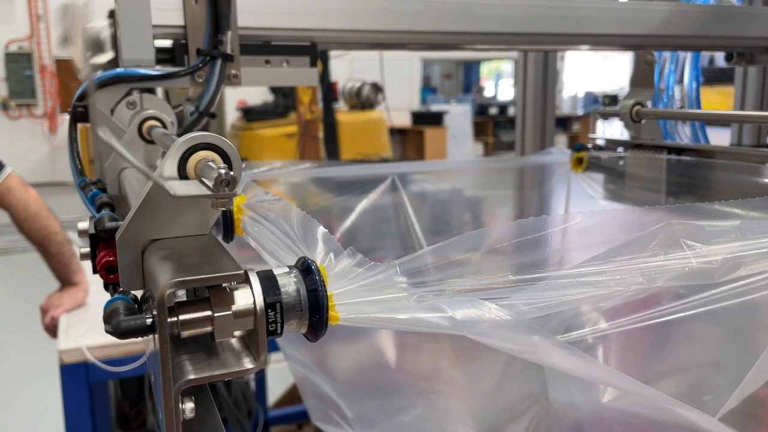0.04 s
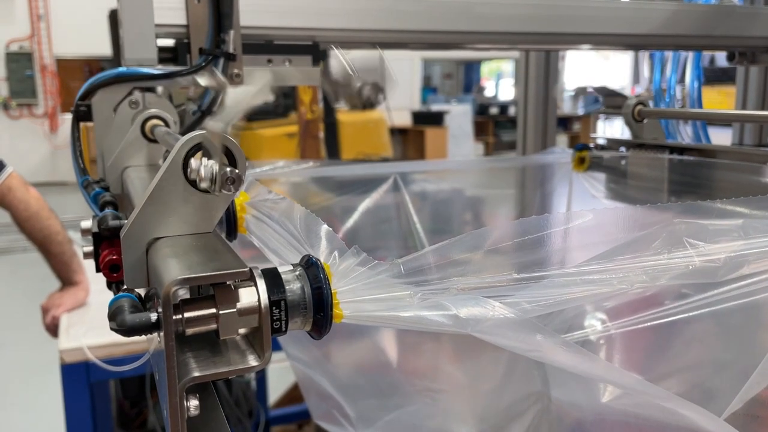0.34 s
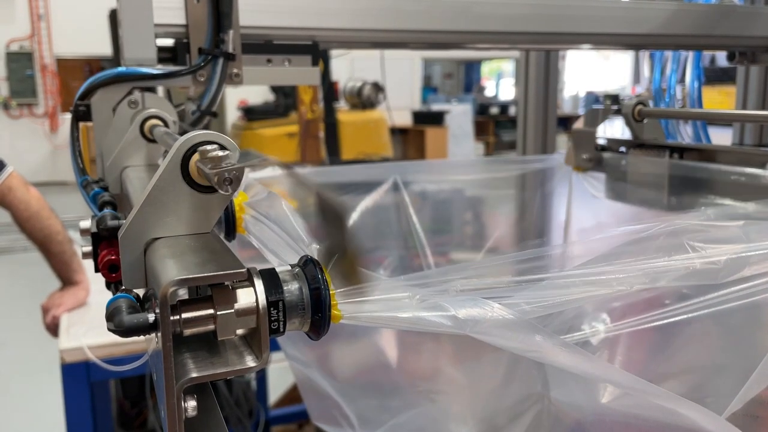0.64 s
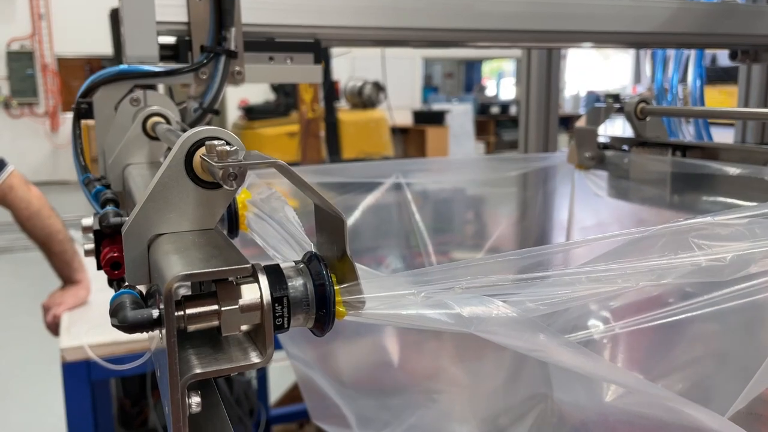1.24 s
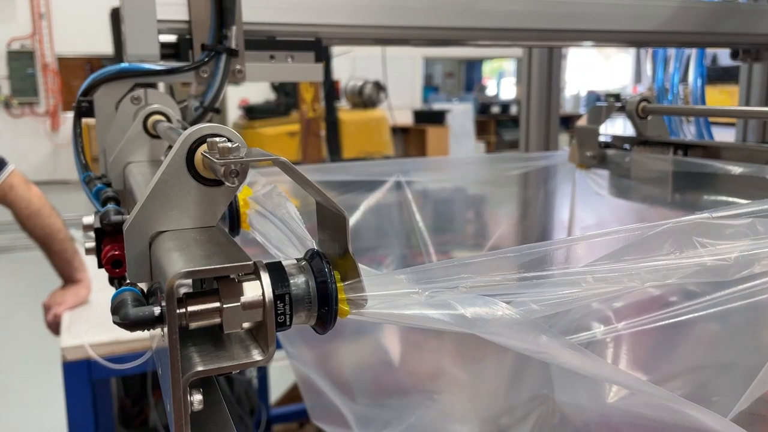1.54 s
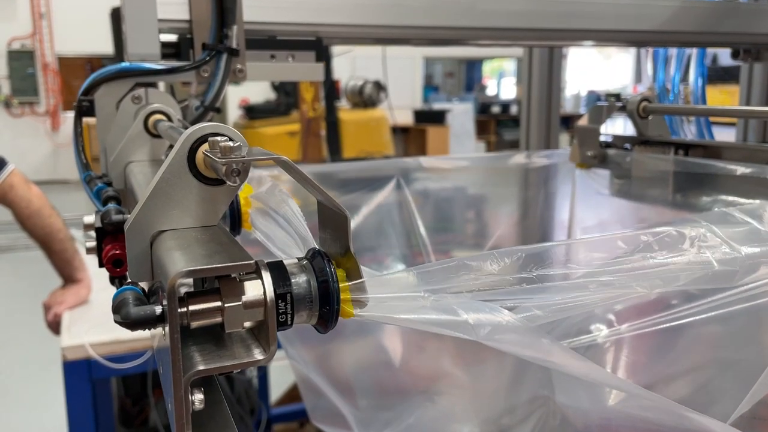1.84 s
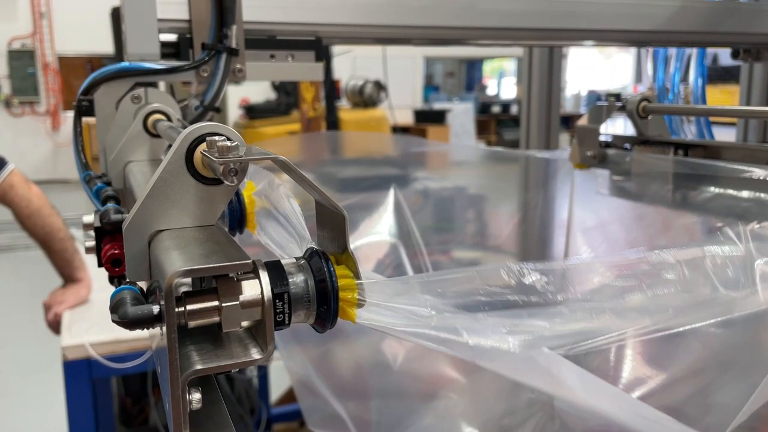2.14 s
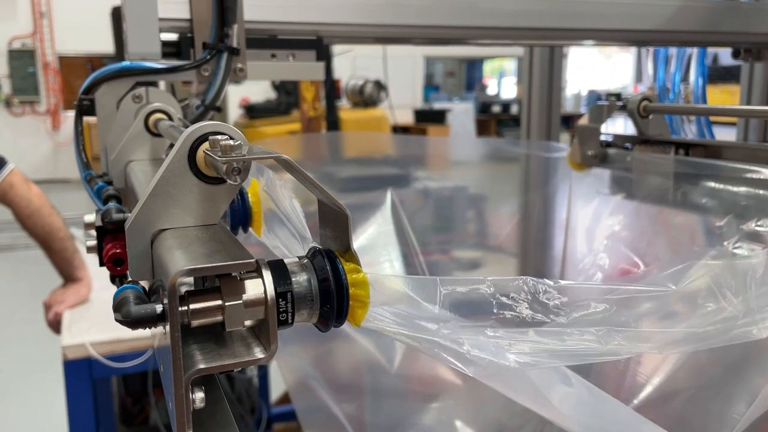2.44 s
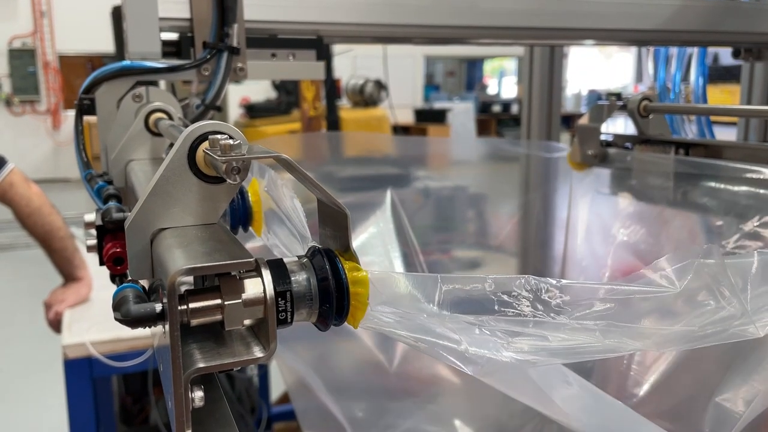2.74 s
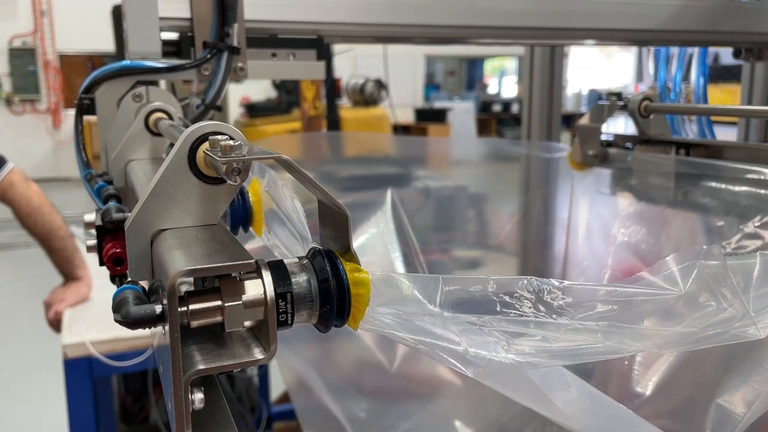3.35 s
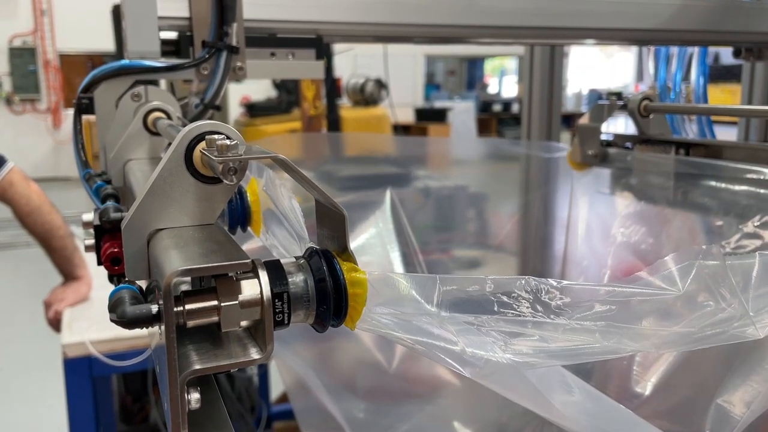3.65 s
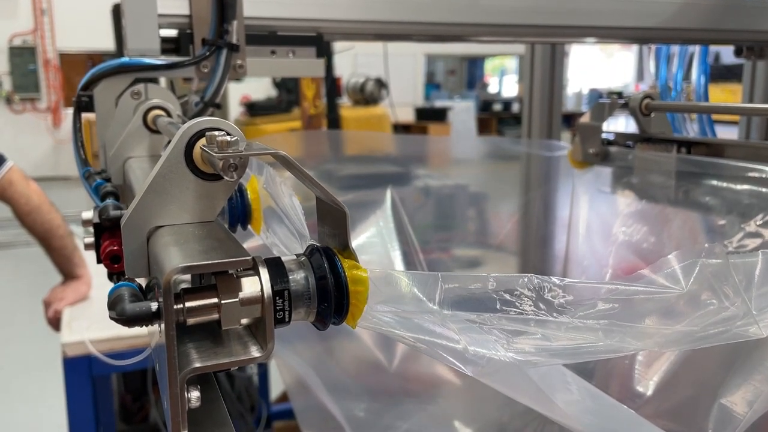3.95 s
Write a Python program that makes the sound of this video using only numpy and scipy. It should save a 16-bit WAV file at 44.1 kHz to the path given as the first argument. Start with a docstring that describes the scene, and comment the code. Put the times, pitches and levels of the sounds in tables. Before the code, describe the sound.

Air hisses loudly and spits at a machine's suction cups, with hollow whistling notes. It shuts off with a soft thump and bleeds away, then a slack plastic bag crinkles and ticks over a faint workshop hum.

```python
"""In a humming workshop, the suction cups of a bag handling machine hold a plastic bag.
Air hisses and spits past their lips and blows hollow notes in the cups and fittings.
The flow shuts off with a soft thump, the vacuum line bleeds down, and the slack bag crinkles and ticks.
Coarse sampling mirrors the whole sound into the treble, where the rumble becomes a thin ring."""
import sys
import numpy as np
from scipy import signal
from scipy.fft import rfft, irfft, next_fast_len
from scipy.io import wavfile
from scipy.ndimage import map_coordinates

SR = 44100
rng = np.random.default_rng(int(sys.argv[2]) if len(sys.argv) > 2 else 0)


def transcribe(signal):
    """Save signal, clipped to [-1, 1], as a 16-bit WAV file at the path in sys.argv[1]."""
    frames = np.atleast_2d(signal).T
    limited = np.clip(frames, -1, 1)
    pcm = np.round(limited * 32767).astype(np.int16)
    wavfile.write(sys.argv[1], SR, pcm)


N = 176400


def amp(db):
    return 10 ** (np.asarray(db) / 20)


def unit(x):
    return x / np.sqrt(np.mean(x ** 2) + 1e-20)


def along(points, hz):
    """Read between (Hz, value) points on a log frequency axis."""
    f, v = np.transpose(points)
    return np.interp(np.log(hz + 1), np.log(f + 1), v)


def seconds():
    return np.arange(N) / SR


def curve(rows):
    """Join (seconds, value) points with straight lines."""
    return np.interp(seconds(), *np.transpose(rows))


def wobble(rate):
    """A smooth curve through `rate` random values a second."""
    return map_coordinates(rng.standard_normal(8192), [seconds() * rate], mode="wrap")


def filtered(x, response):
    """Multiply each frequency in x by response(hz)."""
    size = next_fast_len(N + SR // 2)
    return irfft(rfft(x, size) * response(np.fft.rfftfreq(size, 1 / SR)), size)[..., :N]


# Stereo width of air and hall noise. Each row: frequency in Hz, left-right likeness (1 is identical).
AIR_ALIKE = [(100, 0.68), (350, 0.28), (650, 0.65), (1150, 0.55), (1450, 0.12), (2100, 0.89), (3400, 1),
             (4300, 0.3), (4800, 1)]
HALL_ALIKE = [(30, 1), (100, 0.41), (250, 0.12), (600, 0.092), (4000, 0.032)]
def rush(colour, alike=AIR_ALIKE):
    """Stereo noise of strength 1; its colour (tone) is a table or a gain function."""
    def response(hz):
        gain = colour(hz) if callable(colour) else amp(along(colour, hz))
        turn = np.arccos(np.clip(along(alike, hz), -1, 1)) / 2
        return gain * np.array([np.cos(turn), np.sin(turn)])
    mid, side = filtered(rng.standard_normal((2, N)), response)
    return unit(np.array([mid + side, mid - side]))


# Direction of the cups. Each row: frequency in Hz, radians by which the left channel leads.
LEFT_LEAD = [(0, 0), (200, .5), (480, -0.6), (800, 1.3), (1050, .2), (1300, .8), (1520, -1), (2100, -3),
             (2850, -4.9), (3200, -6), (3750, -6.5), (4100, -7.5), (4750, -9.3)]
def placed(x):
    """The cups are off to one side: their treble arrives on the right first."""
    lead = lambda hz: np.interp(hz, *np.transpose(LEFT_LEAD))
    return filtered(x, lambda hz: np.exp(.5j * np.outer([1, -1], lead(hz))))


def room(x, t60=.17):
    """Nearby panels and walls answer; t60 is the seconds a sound takes to fade by 60 dB."""
    t = np.arange(SR) / SR
    tail = rng.standard_normal((2, SR)) * amp(-60 * t / t60) * (t > .003)
    return amp(-8.5) * signal.fftconvolve(x, tail / np.linalg.norm(tail[0]), axes=1)[:, :N]


def frame(x):
    """Ten faint echoes off the metal frame give the hiss a fine, steady grain."""
    delays_s = rng.uniform(.003, .045, (2, 10))
    signs = rng.choice([-1, 1], (2, 10))
    taps = np.array([np.bincount((d * SR).astype(int), s, SR // 10) for d, s in zip(delays_s, signs)])
    return x + amp(-9) * signal.fftconvolve(x, taps / np.sqrt(10), axes=1)[:, :N]


# Tones of the hum. Each row: pitch in Hz, level in dB.
HUM_TONES = [(84, -86), (151, -74), (258, -91.5)]
def hum():
    """Mains hum: three low tones that waver slightly."""
    return sum(amp(db + 1.5 * wobble(2.81)) * np.sin(2 * np.pi * hz * seconds() + .5 * wobble(4.6))
               for hz, db in HUM_TONES)


# Loudness of the rumble and the wash. Each row: time in seconds, level in dB.
RUMBLE_LEVELS = [(0, -62), (.5, -62), (.85, -57), (.97, -51), (1.12, -60), (1.22, -52), (1.33, -54),
                 (1.44, -51), (1.53, -59), (1.9, -57), (2.3, -63), (2.5, -59), (2.9, -62), (3.4, -61.5),
                 (4, -65)]
WASH_LEVELS = [(0, -59.5), (1.4, -67.5), (2.0, -54.5), (2.35, -59.5), (2.6, -57), (2.8, -66), (3.05, -71.5),
               (3.4, -75.5), (4, -79)]
# Tone of the rumble, fans and wash. Each row: frequency in Hz, relative level in dB.
RUMBLE_COLOUR = [(5, -6), (14, 2.5), (22, -2.5), (33, -15), (48, -5.5), (70, -13.5), (120, -20),
                 (250, -36.5), (600, -63)]
FAN_COLOUR = [(30, -21.5), (150, 5), (230, -1), (450, -8.5), (820, -12), (950, -5), (1100, -21.5),
              (1600, -10.5), (2600, -39), (3600, -39), (4900, -51)]
WASH_COLOUR = [(80, -3.5), (300, 7.5), (900, 7.5), (1600, 3), (2400, -5), (3300, 1), (4000, -34.5),
               (4900, -36)]
def workshop():
    """A rumble swells with the draught, distant fans run, and a soft wash of air dies away."""
    rumble = amp(curve(RUMBLE_LEVELS) - .5) * rush(RUMBLE_COLOUR, HALL_ALIKE)
    fans = amp(-70.5) * rush(FAN_COLOUR, HALL_ALIKE)
    wash = amp(curve(WASH_LEVELS)) * rush(WASH_COLOUR, HALL_ALIKE)
    return rumble + fans + wash


SHUT_OFF_S = 1.4305
# Tone of the low rush after the shut-off. Each row: frequency in Hz, relative level in dB.
BLEED_COLOUR = [(50, -20.5), (170, -5), (300, -3), (520, -2), (680, 5), (790, -10), (950, -16.5),
                (1600, -25)]
def bleed(rise_s=.024, hold_s=.48, fall_db_per_s=31.5):
    """Air rushes back into the line at the shut-off, holds, then dies away."""
    age = seconds() - SHUT_OFF_S
    shape = np.clip(age / rise_s, 0, 1) * amp(-fall_db_per_s * np.maximum(age - hold_s, 0))
    return amp(-49) * shape * placed(rush(BLEED_COLOUR))


# Tone of the puff in the thump. Each row: frequency in Hz, relative level in dB.
PUFF_COLOUR = [(15, -25), (45, -3), (120, -2), (190, 1), (270, -14), (600, -40)]
def thump(puff_t60=.1):
    """The vacuum lets go: a knock and a lower boom in the machine, and a puff."""
    age = np.maximum(seconds() - SHUT_OFF_S, 0)
    ring = lambda hz, t60: amp(-36 - 60 * age / t60) * np.sin(2 * np.pi * hz * age)
    puff_shape = (1 - np.exp(-age / .0009)) * amp(-40.5 - 60 * age / puff_t60)
    return ring(hz=170, t60=.04) + ring(hz=65, t60=.13) + puff_shape * rush(PUFF_COLOUR, HALL_ALIKE)


def crinkle(start_s=2.42, span_s=1.55, middle_hz=2200):
    """Tiny creases tick at random, thinning out as the plastic film settles."""
    out, age = np.zeros(N + SR), np.arange(SR // 100) / SR
    for wait, pitch, softness in rng.random((160, 3)):
        start = start_s + span_s * wait ** 3.1
        cycles = age * middle_hz * 2 ** (2 * pitch - 1)  # up to an octave either way
        db = -38 - 14 * softness - 29 * np.sqrt(wait)
        tick = cycles * np.exp(1 - 2 * cycles) * np.sin(2 * np.pi * cycles)
        out[int(start * SR):][:len(age)] += amp(db) * tick
    return out[:N]


# Tone of a snap's bright rustle and dull flap. Each row: frequency in Hz, relative level in dB.
RUSTLE_COLOUR = [(300, -22.5), (900, 2), (1500, 1), (2200, 4), (3000, 3), (3800, -8), (4900, -10)]
FLAP_COLOUR = [(100, -4), (300, -3.5), (650, -5.5), (950, -7.5), (1400, -8), (3000, -39)]
# Snaps of the bag. Each row: start in seconds, base level in dB, flap offset in dB,
# fade time (t60) in seconds, pop level in dB, pop pitch in Hz.
SNAPS = [(2.4257, -36.5, -17, 0.035, -35, 3380), (2.435, -43.5, -20, .03, -44, 3930),
         (2.4479, -39, -16, 0.093, -45.5, 2900), (2.461, -34.5, -19, 0.11, -43.5, 3100),
         (2.48, -41.5, -24, .12, -46, 2800), (2.4907, -28.5, -20, 0.03, -35.5, 1710),
         (2.502, -41, -11, .07, -47, 2700), (2.547, -46, -10, .06, -52, 1200),
         (2.555, -45.5, -13.5, 0.13, -49, 1400), (2.5753, -46, -23, 0.13, -44, 1200),
         (2.639, -42, -14.5, 0.064, -43.5, 1500), (2.6505, -38.5, -29, .06, -42, 2930),
         (2.655, -52, -22, .057, -39, 1430), (2.683, -60, -12, 0.037, -56, 2800),
         (2.713, -49, -7, 0.051, -53, 1300), (2.778, -53.5, -8, .05, -58, 2740),
         (2.811, -62, -6, .05, -53, 1500), (2.825, -57.5, -12, .025, -59.5, 3000),
         (2.8553, -63, -16, .04, -63, 2800), (2.9846, -64.5, 5, 0.116, -51, 1200),
         (3.15, -66, -5, .047, -57, 1520), (3.2018, -58.5, 10, 0.028, -45.5, 700),
         (3.262, -59.5, -6, .04, -65.5, 3000), (3.27, -47.5, -11, 0.043, -51, 3040),
         (3.401, -65, -11, 0.046, -55.5, 3130), (3.488, -68, -6, .07, -59.5, 3900),
         (3.621, -57, -15, .13, -67, 3000), (3.6268, -49.5, -7, 0.032, -50, 518),
         (3.6443, -51, -18, .04, -59, 3000), (3.651, -47, -20, 0.068, -48, 2700),
         (3.663, -47, -20, .03, -54.5, 3000), (3.6715, -54, -10, .03, -53, 2900),
         (3.71, -69.5, -22, .037, -59.5, 4020), (3.958, -57, -15, 0.11, -64, 3070)]
def snaps(crack_t60=.0075):
    """Each snap of the slack film has a crack, a short grainy rustle and a dull flap of the sheet."""
    bright_power, dull_power = np.zeros((2, N))
    grain = unit(amp(6.5 * wobble(600)))
    for start, db, flap_db, t60, _, _ in SNAPS:
        age = np.maximum(seconds() - start, 0)
        fade = amp(-60 * age / t60)
        crack = amp(5.5 - 60 * age / crack_t60)
        sharp_rise, soft_rise = 1 - np.exp(-age / .00064), 1 - np.exp(-age / .0017)
        bright_power += (amp(db - 7.5) * sharp_rise * (grain * fade + crack)) ** 2
        dull_power += (amp(db + flap_db + 5.5) * soft_rise * fade) ** 2
    return np.sqrt(bright_power) * rush(RUSTLE_COLOUR) + np.sqrt(dull_power) * rush(FLAP_COLOUR)


def pops(delay_s=.00036, rise_cycles=.41):
    """Each snap starts as a crease flips over: a high pop if it is tight, a dull knock if it is wide."""
    out = np.zeros(N)
    for start, _, _, _, db, hz in SNAPS:
        cycles = np.maximum(seconds() - start - delay_s, 0) * hz
        rise = cycles / rise_cycles
        out += amp(db) * rise * np.exp(1 - rise) * np.sin(2 * np.pi * cycles)
    return out


def line_flow(hold_s=1.86):
    """Strength of the flow in the vacuum line: it holds, then falls ever faster as the line empties."""
    age = np.maximum(seconds() - hold_s, 0)
    return amp(-43 - 27 * age - 22 * age ** 2)


# Tone of the vacuum line. Each row: frequency in Hz, relative level in dB.
LINE_COLOUR = [(100, -21.5), (420, -14), (680, -6), (950, -11), (1400, -8.5), (1620, 0), (1800, -10),
               (2220, -10.5), (2350, -0.5), (2650, 4), (3250, 4.5), (3450, 5.5), (3650, -20.5), (3900, -1),
               (4300, 2), (4600, 11.5), (4950, -7.5)]
def line_hiss():
    """The vacuum line hisses roughly and holds on while the leak fades."""
    roughness = amp(3.5 * wobble(160))
    return amp(-5.5) * line_flow() * unit(roughness * rush(LINE_COLOUR))


# Resonances of the cups and fittings. Each row: pitch in Hz, width in Hz,
# gain on LEAK_LEVELS in dB, gain on line_flow() in dB.
HOLLOWS = [(174.5, 60, -30, -28.5), (698, 130, -21, -15), (845, 230, -17.5, -29), (2726, 140, -10, -20.5),
           (2892, 200, -11, -14.5), (4056, 137, -25.5, -5.5), (4647, 60, -31.5, -10.5)]
def hollow_notes():
    """Both flows blow notes in the cups and fittings; each flutters in pitch and strength."""
    out = np.zeros((2, N))
    for centre, width, leak_db, line_db in HOLLOWS:
        band = signal.hilbert(rush(lambda hz: 1 / (1 + (2 * (hz - centre) / width) ** 2)))
        drift = 2 * np.pi * np.cumsum(centre * .009 * wobble(30)) / SR  # pitch wanders by about 1%
        whistle = unit(amp(1.8 * wobble(55)) * (band * np.exp(1j * drift)).real)
        out += whistle * np.hypot(amp(leak_db + curve(LEAK_LEVELS)), amp(line_db) * line_flow())
    return out


# Short spits of air at a cup lip. Each row: time of the peak in seconds, level in dB, length in seconds.
SPITS = [(0.438, -55, 0.0093), (0.51, -43, 0.0034), (0.528, -40, 0.015), (0.542, -36, 0.021),
         (0.629, -36, 0.025), (0.653, -52, .007), (0.688, -43, 0.0051), (0.784, -35, 0.0064),
         (0.786, -41, 0.0073), (0.959, -43, 0.0078), (1.042, -42.5, 0.023), (1.178, -46, .006),
         (1.19, -43, 0.002), (1.214, -39, .013), (1.276, -38, 0.0072), (1.376, -55, 0.013),
         (1.412, -36.5, .005), (1.421, -38, 0.0051), (1.455, -33, 0.003), (1.473, -37, .009)]
def spitting(start_s=.14, end_s=1.59, centre_hz=2830, width_hz=140):
    """The film flutters on a lip: a random sputter and single spits sound in one resonance."""
    t = seconds()
    active = np.clip((t - start_s) / .27, 0, 1) * np.clip((end_s - t) / .046, 0, 1)
    sputter = amp(-45) * active * unit(amp(1.5 * wobble(150)))
    spit_power = sum(amp(db) ** 2 * np.exp(-(2 * (t - peak) / length) ** 2) for peak, db, length in SPITS)
    cavity = lambda hz: 1 / (1 + (2 * (hz - centre_hz) / width_hz) ** 2) ** .61
    return np.sqrt(sputter ** 2 + spit_power) * rush(cavity)


# Loudness of the leak at the cups. Each row: time in seconds, level in dB before gain_db is added.
LEAK_LEVELS = [(0, -40), (.25, -41.5), (.6, -41.5), (1.0, -41), (1.45, -43), (1.56, -44.5), (1.68, -50),
               (1.85, -54.5), (2.1, -58.5), (2.35, -63), (2.7, -70.5), (3.1, -100)]
# Tone of the leak. Each row: frequency in Hz, relative level in dB.
LEAK_COLOUR = [(100, -35.5), (270, -21.5), (400, -10.5), (520, -8), (780, -3.5), (1000, -13.5), (1220, -5),
               (1400, -13), (1540, -0.5), (1800, -4), (2230, 4), (2520, -1.5), (2750, 1), (3150, -5),
               (3380, -17), (3540, -27.5), (3750, -4.5), (4050, -4.5), (4400, -7), (4650, -15.5),
               (4900, -18.5)]
def leak(gain_db=3):
    """Swirling air hisses past the cup lips, trembling quickly."""
    tremble = amp(wobble(220))
    return amp(gain_db + curve(LEAK_LEVELS)) * unit(tremble * rush(LEAK_COLOUR))


def scene():
    """The air and the bag, with their echoes, over the shut-off and the workshop."""
    bag = snaps() + pops() + crinkle()
    air = leak() + line_hiss() + spitting() + hollow_notes()
    return frame(placed(air)) + placed(bag) + room(bag) + thump() + bleed() + hum() + workshop()


def record(dry, step=4, band_hz=4850, top_hz=15900):
    """Keeping every fourth sample of the low band, with silent gaps between, mirrors that band upward."""
    narrow = filtered(dry, lambda hz: amp(-np.clip((hz - band_hz) * .25, 0, 120)))
    coarse = step * narrow * (np.arange(N) % step == 0)
    return filtered(coarse, lambda hz: hz < top_hz)


dry = scene()
out = record(dry)
transcribe(out)
```